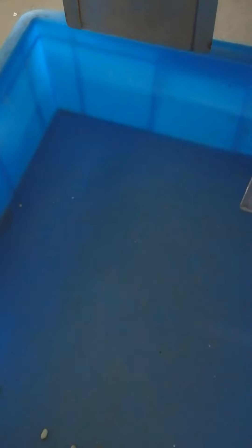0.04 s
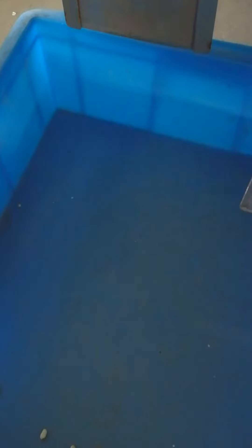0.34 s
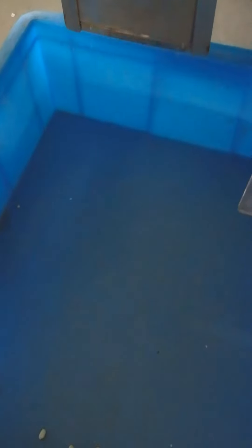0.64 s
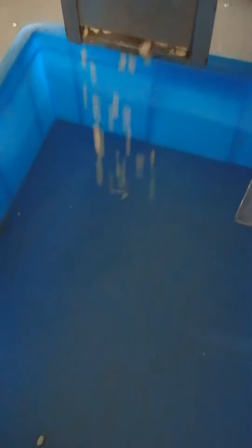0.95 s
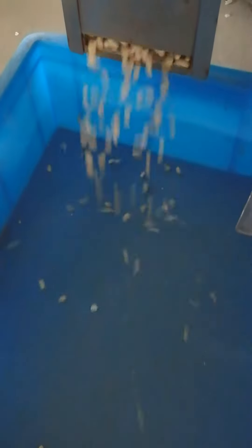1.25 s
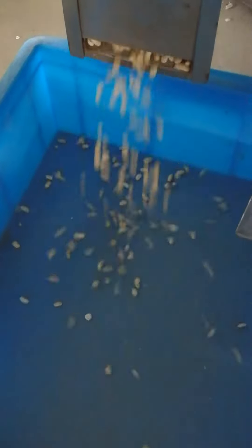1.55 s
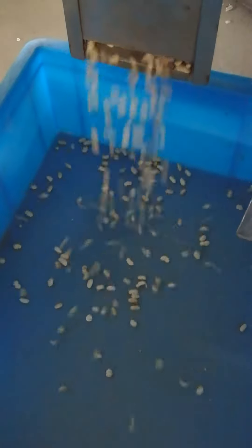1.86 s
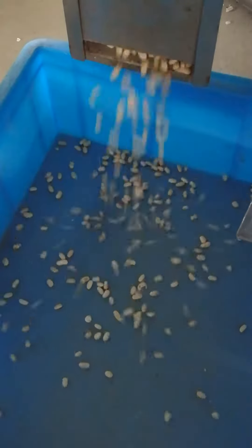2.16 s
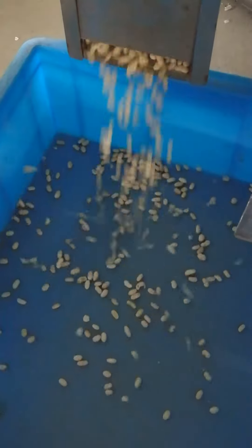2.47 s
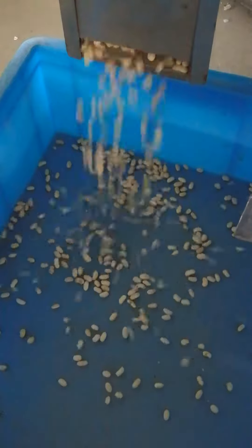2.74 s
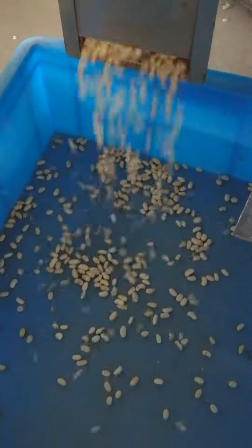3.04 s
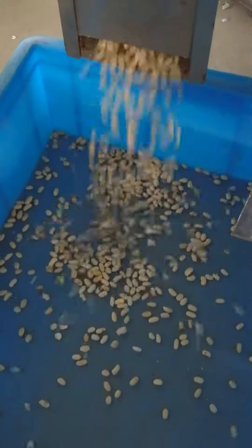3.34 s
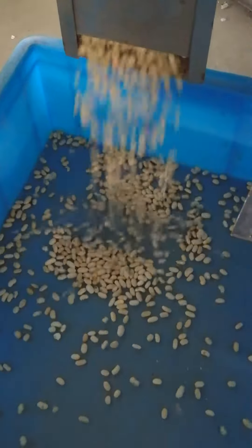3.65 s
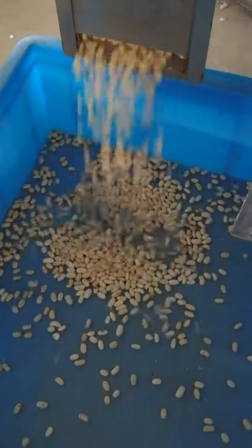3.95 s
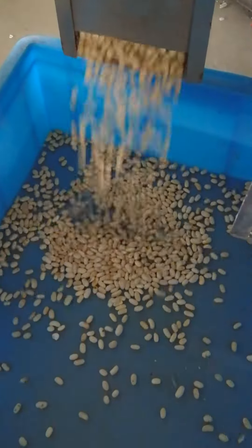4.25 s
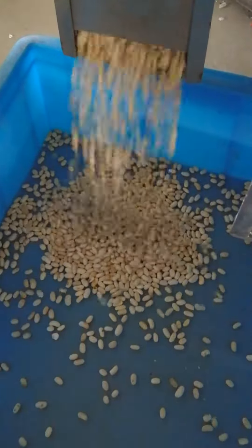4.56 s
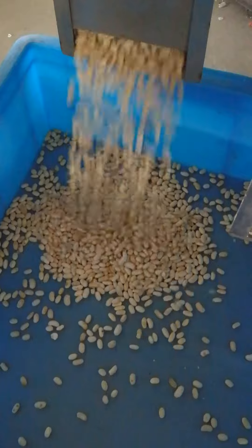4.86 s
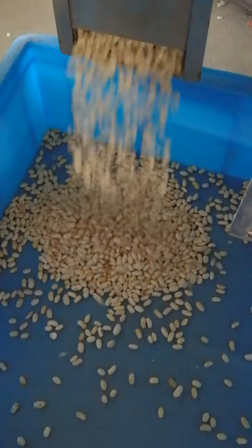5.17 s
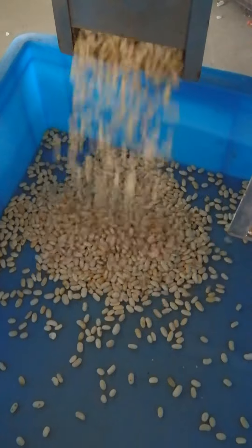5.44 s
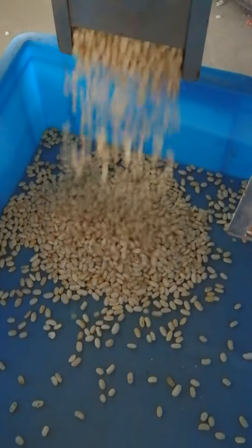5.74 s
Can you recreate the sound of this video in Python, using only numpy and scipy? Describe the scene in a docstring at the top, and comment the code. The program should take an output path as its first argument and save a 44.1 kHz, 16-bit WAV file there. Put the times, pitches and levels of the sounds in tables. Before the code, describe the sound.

Over a low machinery hum, dry beans pour into an empty plastic bin, their hard clatter easing into softer ticking.

```python
"""Dry beans pour down a steel chute into an empty plastic bin, close by.
A machine hums behind as beans start to skitter on the steel. From 0.84 s they hit the bare floor: each
cracks, rings the bin's modes and flutters between the walls, while the hum sinks away. The stream
thickens; from 3.8 s the loaded floor booms softly. Around 4.8 s the heap covers the floor, and the
hard rattle gives way to softer, brighter bean-on-bean ticking."""
import sys
import numpy as np
from scipy import signal
from scipy.fft import rfft, irfft, next_fast_len
from scipy.io import wavfile

SR = 44100
rng = np.random.default_rng(int(sys.argv[2]) if len(sys.argv) > 2 else 0)


def to_wav(s):
    """Save 16-bit WAV."""
    ch = np.atleast_2d(s).T  # columns
    pcm = np.round(np.clip(ch, -1, 1) * 32767)  # PCM
    wavfile.write(sys.argv[1], SR, pcm.astype(np.int16))


N = 264600
TIME = np.arange(N) / SR

# bin resonances: (frequency [Hz], width [Hz], level [dB])
BIN_RESONANCES = [(417, 41, -5), (525, 10.4, -6), (748, 40, -4), (966, 19, -3), (1136, 47, -2.5),
                  (1440, 35, 0), (1670, 87, -13), (2485, 30, -1.5), (2954, 90, -2), (3356, 35, 1),
                  (3915, 86, -5.5), (4290, 38, -12), (4777, 62, -2), (5120, 130, -1)]


def undb(db):
    """Decibels to gain."""
    return 10 ** (np.asarray(db) / 20)


def unit(x):
    """Scale to rms 1."""
    return x / np.sqrt(np.mean(x ** 2))


def ramp(start_s, length_s):
    """Linear rise from 0 to 1, then held."""
    return np.clip((TIME - start_s) / length_s, 0, 1)


def over_time(table):
    """A (time [s], value) table at every sample."""
    return np.interp(TIME, *np.transpose(table))


def over_bins(table, size):
    """A (frequency [Hz], value) table at every FFT bin."""
    hz, value = np.transpose(table)
    return np.interp(np.log(np.arange(size // 2 + 1) * SR / size + 1), np.log(hz), value)


def treble(x, corner_hz):
    """First-order high-pass."""
    return signal.lfilter(*signal.butter(1, corner_hz, "high", fs=SR), x)


def colour(x, table, power=1):
    """Minimum-phase filter from a (frequency [Hz], gain [dB]) table; attacks stay sharp."""
    size = next_fast_len(x.shape[-1], True)
    size += size % 2
    cepstrum = irfft(power * np.log(undb(over_bins(table, size))))
    cepstrum[1:size // 2] *= 2
    cepstrum[size // 2 + 1:] = 0
    return irfft(rfft(x, size) * np.exp(rfft(cepstrum)), size)[..., :x.shape[-1]]


def stereo_noise(size, count):
    """Noises (2, count, size): channels alike in the bass, unrelated in the treble."""
    # left-right likeness: (frequency [Hz], correlation [0-1])
    correlation = [(100, 0.99), (200, 1), (400, 0.12), (800, 0.13), (3000, 0.012)]
    alike = np.clip(over_bins(correlation, size), 0, 1)
    mid, side = rfft(rng.standard_normal((2, count, size)))
    mid, side = mid * np.sqrt((1 + alike) / 2), side * np.sqrt((1 - alike) / 2)
    return irfft(np.stack([mid + side, mid - side]), size)


def resonance(hz, width_hz):
    """Noise-driven resonance, rms 1."""
    b, a = signal.iirpeak(hz, hz / width_hz, SR)
    return unit(signal.lfilter(b, a, signal.lfilter(b, a, rng.standard_normal(N))))


def impacts(modes, ring_db, crack_db, flutter_t60_s, treble_t60_s, tail_db, tail_t60_s, spots=40):
    """One bean's impact at many spots: wall flutter, room tail, direct crack, ringing modes."""
    t = np.arange(4096) / SR
    fade = lambda t60_s: np.exp(-np.log(1000) * t / t60_s)
    unit_energy = lambda x: unit(x) / np.sqrt(len(t))
    echoes = lambda t60_s: unit_energy(fade(t60_s) * (1 - np.exp(-t / 0.0004)))
    noise = stereo_noise(len(t), spots)
    highs = treble(noise, corner_hz=6260)
    tail = undb(tail_db) * unit_energy(fade(tail_t60_s))
    out = (noise - highs) * (echoes(flutter_t60_s) + tail) + highs * echoes(treble_t60_s)
    crack = undb(crack_db + 3 * rng.uniform(-1, 1, spots))
    lag_samples = rng.integers(7, 11, spots)  # the left side hears it first
    out[0, :, 0] += crack
    out[1, np.arange(spots), lag_samples] += crack
    for hz, width_hz, db in modes:
        drive, detune, skew_rad = rng.uniform(-1.05, 1, (3, spots, 1))
        left_rad = 2 * np.pi * hz * (1 + .004 * detune) * t
        right_rad = left_rad - skew_rad - 2 * np.pi * hz * lag_samples[:, None] / SR
        ring = drive * np.exp(-np.pi * width_hz * t) * np.sin([left_rad, right_rad])
        out += undb(ring_db + db) * unit_energy(ring)
    return out


def voiced(sounds, spectrum, balance):
    """Colour impacts, pan them band by band and equalise their energies."""
    left, right = colour(sounds, spectrum)
    sounds = np.stack([colour(left, balance, power=0.84), colour(right, balance, power=-0.22)])
    energy = np.sum(sounds.mean(0) ** 2, axis=-1)
    return sounds / np.sqrt(energy)[:, None]


def strike(sounds, times_s, gains, bright_db):
    """One impact from a random spot at each time; harder contact has more treble."""
    length = sounds.shape[-1]
    highs = treble(sounds, corner_hz=6500)
    boost = undb(bright_db) - 1
    out = np.zeros((2, N + length))
    spots = rng.integers(0, sounds.shape[1], len(times_s))
    for i in np.flatnonzero(gains):
        start = int(np.clip(times_s[i] * SR, 0, N))
        out[:, start:start + length] += gains[i] * (sounds[:, spots[i]] + boost[i] * highs[:, spots[i]])
    return out[:, :N]


def shower(sounds, rate_per_s, bright_db, spread_db, hardness_db, slots=18000):
    """Random impacts, rms near 1: first falls loud and bright, bounces weaker and duller."""
    jitter, pick, bounce, hardness = rng.random((slots, 4)).T
    times_s = (np.arange(slots) + jitter) / slots * N / SR
    rate_per_s = np.interp(times_s, TIME, rate_per_s)
    occurs = pick < rate_per_s * N / SR / slots
    gains = unit(undb(-spread_db * bounce)) * np.sqrt(SR / rate_per_s)
    bright_db = np.interp(times_s, TIME, bright_db) + hardness_db * (hardness - bounce - .5)
    return strike(sounds, times_s, gains * occurs, bright_db)


def heap_cover(halfway_s=4.76, pace_s=0.19):
    """Share of the landing spot covered by the heap, 0-1."""
    return 1 / (1 + np.exp(-(TIME - halfway_s) / pace_s))


def machine(sink_s=0.83):
    """Unsteady motor hum, rumble and air; all sink away, the rumble partly returns as the heap grows."""
    sunk = ramp(sink_s, 0.069)
    rumble_db = -46.5 - 10 * sunk + 5 * heap_cover()
    hum_db = -46.5 - sunk * (6.5 + 6 * (TIME - sink_s))
    # rumble spectrum: (frequency [Hz], level [dB])
    rumble_spectrum = [(12, -38), (20, -18), (48, -7), (130, -5.5), (168, -13), (222, -11), (248, -16.5),
                       (319, -7), (357, -14), (527, -28), (590, -27), (642, -53), (14700, -38.5),
                       (16000, -65)]
    # moving-air spectrum: (frequency [Hz], level [dB])
    air_spectrum = [(300, -10.5), (700, -6), (1100, -4.5), (2000, -14.5), (3100, -13.5), (5000, -32),
                    (16000, -37)]
    rumble, air = stereo_noise(N, count=2).swapaxes(0, 1)
    rumble = unit(colour(rumble, rumble_spectrum)) * undb(rumble_db)
    hum = np.sqrt(2) * np.sin(2 * np.pi * 166.3 * TIME) + 0.11 * resonance(hz=162, width_hz=5)
    peak_s, decay_s = 0.049, 0.11
    gust = undb(-49.5) * ramp(0, peak_s) * np.exp(-np.maximum(TIME - peak_s, 0) / decay_s)
    hiss = undb(-50 - 7.5 * TIME)
    return rumble + hum * undb(hum_db) + unit(colour(air, air_spectrum)) * (gust + hiss)


def floor_boom():
    """Loaded by the heap, the bin floor booms softly, then settles lower."""
    level_db = -55.5 - 8.5 * ramp(5.15, 0.13)
    return resonance(hz=72, width_hz=18) * undb(level_db) * ramp(3.83, 0.13)


def chute():
    """Beans skitter down the steel and ring it faintly."""
    # chute resonances: (frequency [Hz], width [Hz], level [dB])
    modes = [(2870, 66, 9), (3420, 90, -2), (4150, 130, -19), (6500, 200, -7), (8250, 170, -5)]
    # bean on steel: (frequency [Hz], gain [dB])
    spectrum = [(120, -16.5), (240, 4.5), (350, 3.5), (500, 3), (680, -13), (1800, -13), (3300, 1),
                (5000, -5.5), (7500, -6.5), (11000, -12.5), (16000, -11.5)]
    # chute panning: (frequency [Hz], leftward tilt [dB])
    balance = [(330, -0.5), (1500, 6), (3200, -5), (7000, 3), (13000, 12.5)]
    # strength of the slide: (time [s], level [dB])
    slide = [(0.3, -59.5), (0.6, -55), (0.69, -47), (0.73, -51.5), (0.78, -42), (0.82, -49.5), (1.0, -42.5),
             (4.4, -52.5), (5.1, -39), (6.0, -43.5)]
    hits = impacts(modes, ring_db=-21, crack_db=-8.5, flutter_t60_s=0.035, treble_t60_s=0.031,
                   tail_db=2.5, tail_t60_s=0.18)
    skitter = shower(voiced(hits, spectrum, balance), rate_per_s=np.full(N, 700.),
                     bright_db=np.zeros(N), spread_db=11, hardness_db=5)
    return skitter * undb(over_time(slide))


def heap_impacts():
    """Bean on bean: a tick, with the bin muffled by the heap."""
    # bean on heap: (frequency [Hz], gain [dB])
    spectrum = [(71, -24), (130, -24), (260, -21), (500, -3.5), (750, -5.5), (900, -5.5), (1240, -1.5),
                (1460, 2), (2200, 2), (3100, 8), (4200, 3.5), (10800, -0.5), (13900, -0.5), (16000, -3.5)]
    # heap panning: (frequency [Hz], leftward tilt [dB])
    balance = [(200, 0), (450, 7), (800, 14.5), (1400, 7.5), (2100, 11.5), (3000, 4), (5000, 5.5),
               (8000, 11.5), (11000, 13), (14000, 18)]
    hits = impacts(BIN_RESONANCES, ring_db=-20.5, crack_db=-14.5, flutter_t60_s=0.022,
                   treble_t60_s=0.012, tail_db=-0.5, tail_t60_s=0.19)
    return voiced(hits, spectrum, balance)


def floor_impacts():
    """Bean on bare plastic: a hard crack that rings the bin."""
    # bean on floor: (frequency [Hz], gain [dB])
    spectrum = [(71, -51), (130, -28), (190, -27), (260, -14), (510, -12.5), (620, -13), (950, -10),
                (1240, -8.5), (1450, -3), (2100, -0.5), (3400, 1.5), (4900, 0.5), (10200, -6), (13900, -9),
                (16000, -13)]
    # floor panning: (frequency [Hz], leftward tilt [dB])
    balance = [(200, 2.5), (450, -1), (750, 7), (1400, 4), (2100, 1.5), (3000, -2), (5000, 0), (8000, 4),
               (11000, 5.5), (14000, 12.5)]
    hits = impacts(BIN_RESONANCES, ring_db=-15, crack_db=-8.5, flutter_t60_s=0.049,
                   treble_t60_s=0.024, tail_db=-6.5, tail_t60_s=0.14)
    return voiced(hits, spectrum, balance)


def clumps(pour_db, avoid_s, start_s=1.22, gap_s=0.015, fade_db_per_s=1.7, slots=270):
    """Clumps knock unevenly on what floor is bare: rows of (time [s], level [dB], brightness [dB])."""
    times_s = (np.arange(slots) + rng.random(slots)) / slots * N / SR
    strength, hardness = 2 * rng.random((slots, 2)).T - 1
    bare_db = 10 * np.log10(1 - heap_cover() + 1e-9)
    excess_db = 8.5 + 3.5 * strength - fade_db_per_s * (times_s - start_s)
    level_db = np.interp(times_s, TIME, pour_db + bare_db) + excess_db
    clear = np.abs(times_s[:, None] - avoid_s).min(axis=1) > gap_s
    level_db = np.where(clear & (times_s > start_s), level_db, -np.inf)
    return np.column_stack([times_s, level_db, -1 + 8.5 * hardness])


def landings(on_floor, pour_db, tip_s=0.0035):
    """Lone beans and clumps strike the floor, tip over and hit again."""
    # first lone beans and hardest later landings: (time [s], level [dB], brightness [dB])
    accents = [(0.839, -46, 17), (0.852, -39, 14), (0.8762, -20.5, 9), (0.8982, -16, 3.5), (0.9251, -17, 1),
               (0.932, -8.5, -8), (0.942, -14, 4), (0.955, -11, -3), (0.985, -11, -9), (1.0073, -12, 4),
               (1.021, -10, -2), (1.0542, -20, 8), (1.0704, -12, 3), (1.0764, -14.5, 3), (1.097, -14.5, 0),
               (1.1283, -6.5, -14), (1.151, -11, -1), (1.1632, -14.5, 0), (1.177, -5, -9), (1.2, -13.5, -6),
               (1.2121, -15, 6), (1.2448, -11, 0), (1.2733, -15, 0), (1.3025, -14, 11.5), (1.3646, -17, 8),
               (1.384, -11, 4), (1.439, -10, 2), (1.4722, -7, -0.5), (1.526, -10.5, 2.5), (1.584, -14, 7),
               (1.66, -10.5, -6), (1.7729, -8, 0), (1.8127, -7, -7), (1.8766, -9.5, -6), (1.92, -6.5, -10),
               (1.953, -6.5, 1), (2.0787, -12, 1), (2.1029, -6.5, -1), (2.14, -9.5, 1), (2.173, -9.5, -12),
               (2.2118, -10.5, 1), (2.2417, -7.5, -3), (2.3032, -5.5, -18), (2.378, -10, -17),
               (2.5482, -11, 2), (2.5827, -8.5, -1), (2.821, -11, -3), (2.973, -12, 2.5), (3.02, -14, 0),
               (3.0583, -11, 2), (3.139, -7, -5), (3.2015, -7, -3.5), (3.24, -11, -4), (3.4485, -13.5, 0),
               (3.8819, -13.5, 3), (3.926, -24, 13), (4.0439, -14, 9.5), (4.0931, -13, 2), (4.227, -10, -2),
               (4.274, -18, 10), (4.294, -11, 4), (4.382, -20, 13.5), (4.7417, -29, 13), (4.854, -25, 11)]
    clump_rows = clumps(pour_db, avoid_s=np.array(accents)[:, 0])
    times_s, level_db, bright_db = np.vstack([accents, clump_rows]).T
    gains = undb(level_db) * np.sqrt(0.0015 * SR)  # energy of 1.5 ms at that level
    first = strike(on_floor, times_s, gains, bright_db)
    again_s = times_s + tip_s * (.5 + rng.random(len(times_s)))
    return first + strike(on_floor, again_s, gains * undb(-3), bright_db)


def stream(on_floor, on_heap, pour_db, arrival_s=0.92, doubling_s=1.9):
    """The stream thickens, brightens as more beans meet each other, and shifts from floor to heap."""
    pouring_s = TIME - arrival_s
    rate_per_s = 310 * 2 ** (pouring_s / doubling_s)
    bright_db = -4 + 1.68 * pouring_s
    rattle = shower(on_floor, rate_per_s, bright_db, spread_db=18, hardness_db=7) * undb(2)
    ticking = shower(on_heap, rate_per_s, bright_db, spread_db=22.5, hardness_db=3) * undb(1.5)
    heap_share = 0.055 + 0.815 * heap_cover()
    blend = np.sqrt(1 - heap_share) * rattle + np.sqrt(heap_share) * ticking
    return blend * undb(pour_db) * ramp(arrival_s, 0.0073)


def beans():
    """Beans fall into the bin: a dense stream with distinct landings on top."""
    # strength of the pour: (time [s], level [dB])
    pour = [(0.92, -27.5), (1.08, -32), (1.32, -20), (1.5, -27.5), (1.55, -22), (1.7, -22.5), (2.12, -22.5),
            (2.33, -26), (2.43, -22.5), (2.78, -21.5), (3.0, -25), (3.1, -21), (3.78, -20.5), (3.97, -23.5),
            (4.5, -23.5), (5.2, -28.5), (5.75, -30.5), (6.0, -30.5)]
    pour_db = over_time(pour)
    on_floor, on_heap = floor_impacts(), heap_impacts()
    return stream(on_floor, on_heap, pour_db) + landings(on_floor, pour_db)


def scene():
    """Chute, bin and machine together."""
    return chute() + beans() + floor_boom() + machine()


def compress(x, knee_db, squeeze, follow_s):
    """Gain falls as the smoothed power passes the knee."""
    pole = np.exp(-1 / (follow_s * SR))
    power = signal.lfilter([1 - pole], [1, -pole], np.mean(x ** 2, axis=0))
    return x * (1 + power / undb(knee_db) ** 2) ** (-squeeze / 2)


def record(dry):
    """Even out the rattle, limit the peaks, low-pass at 15.9 kHz."""
    even = compress(dry, knee_db=-13.5, squeeze=0.27, follow_s=0.0023)
    limited = compress(even, knee_db=-6.5, squeeze=1, follow_s=0.0004)
    return signal.sosfilt(signal.ellip(12, .2, 80, 15900, fs=SR, output="sos"), limited)


dry = scene()
out = record(dry)
to_wav(out)
```